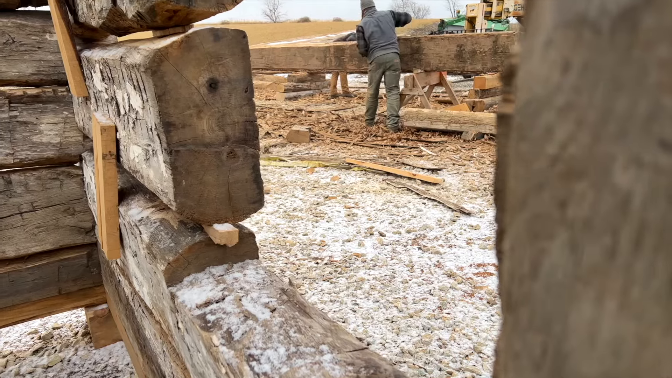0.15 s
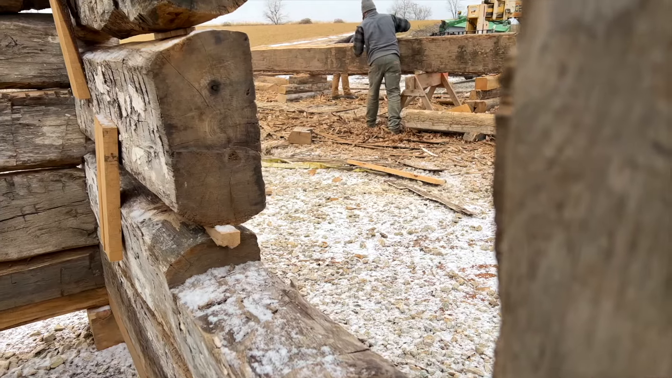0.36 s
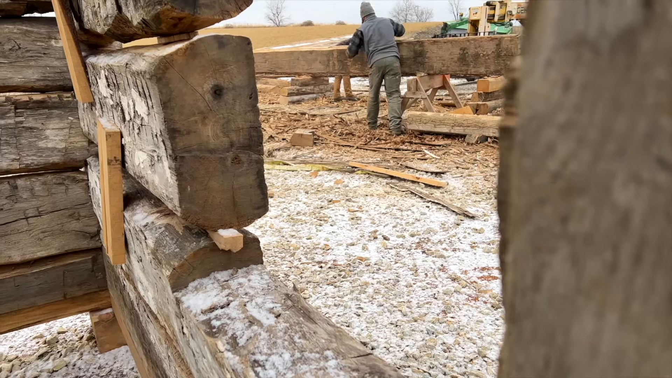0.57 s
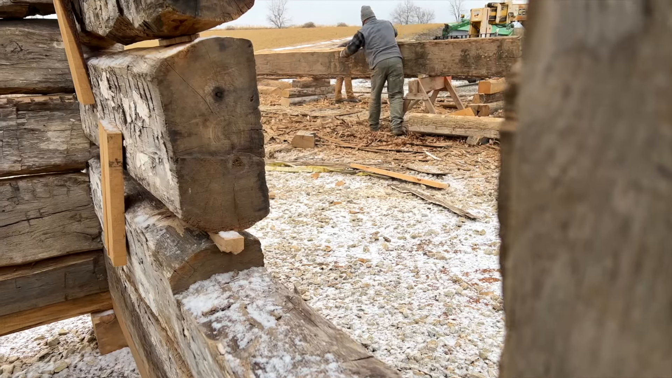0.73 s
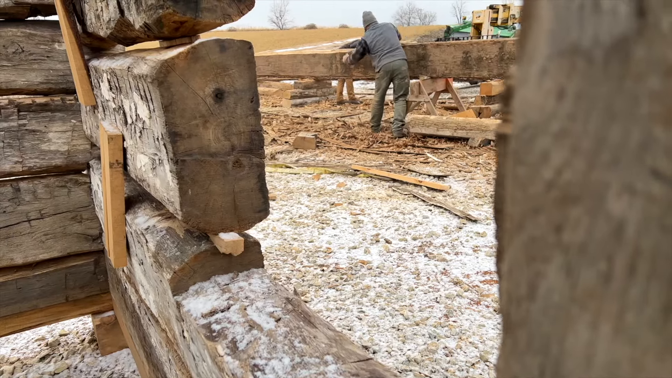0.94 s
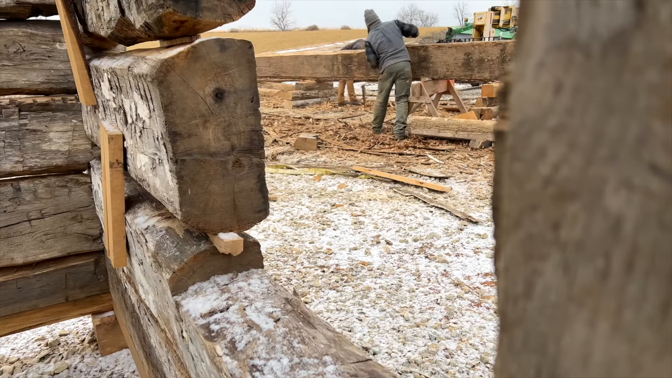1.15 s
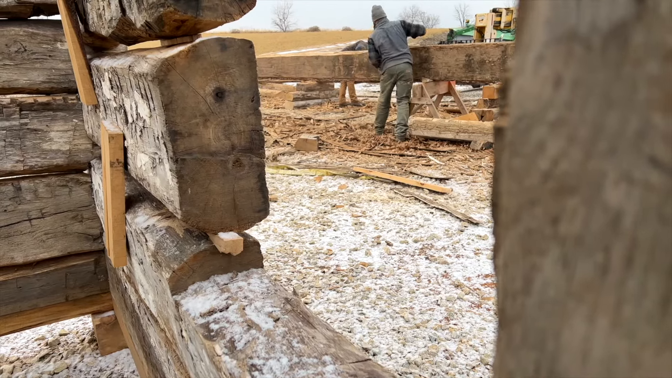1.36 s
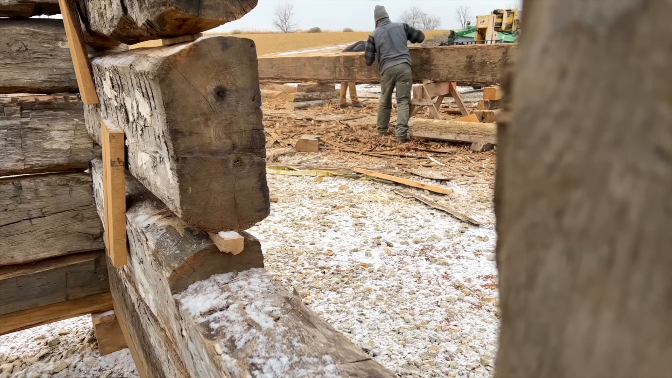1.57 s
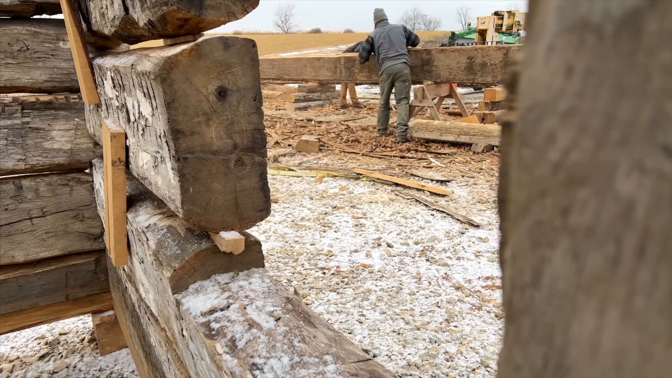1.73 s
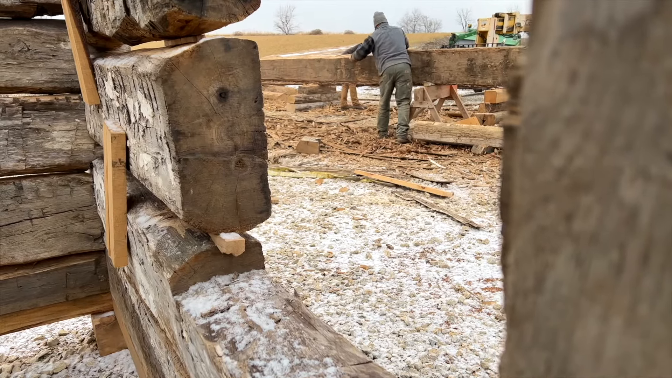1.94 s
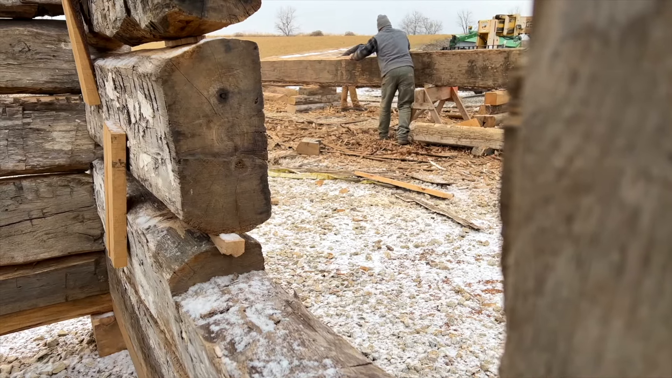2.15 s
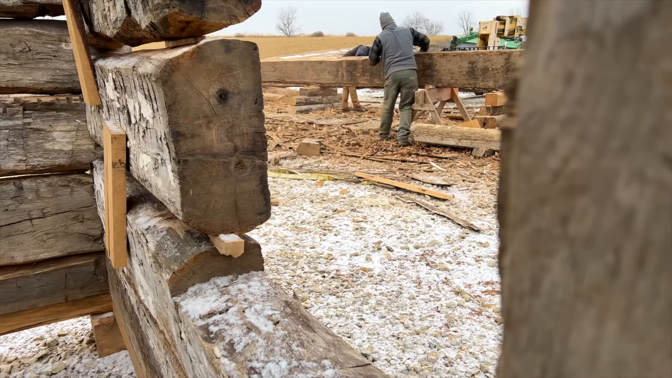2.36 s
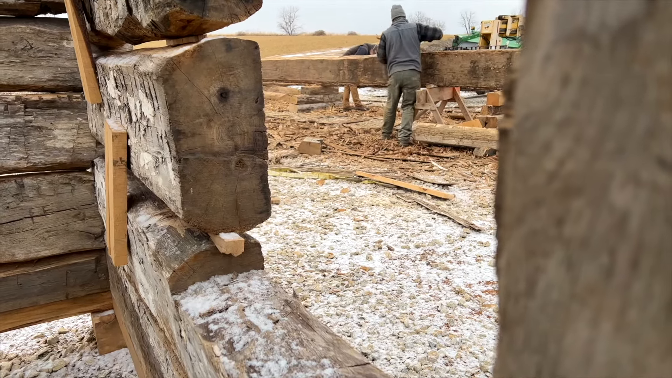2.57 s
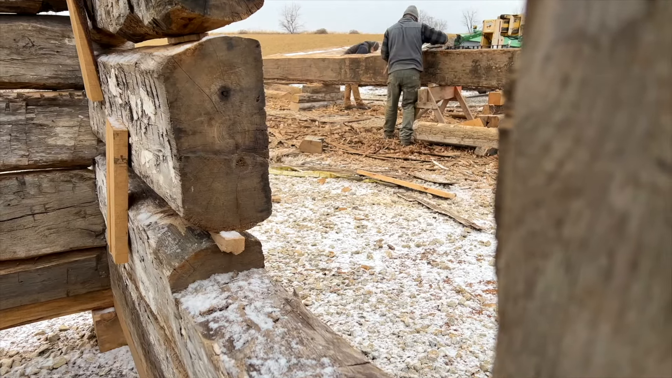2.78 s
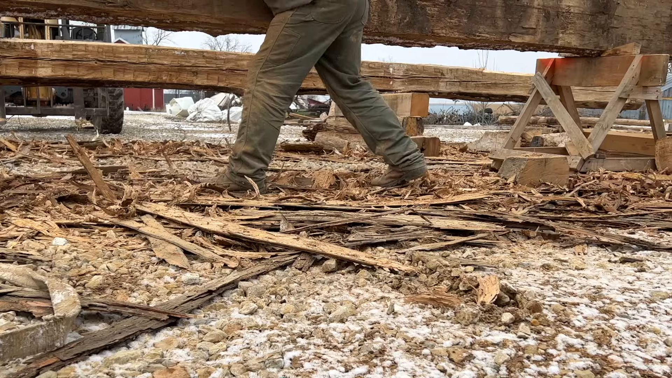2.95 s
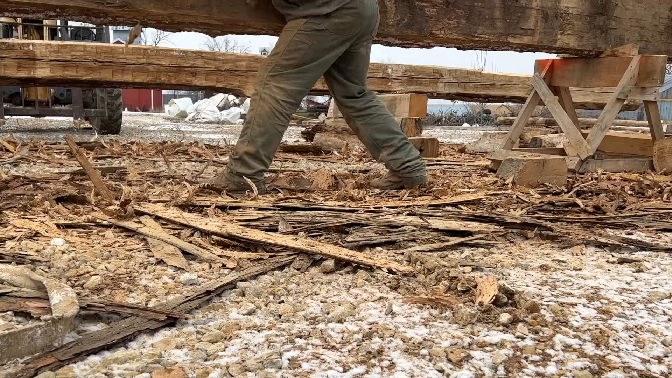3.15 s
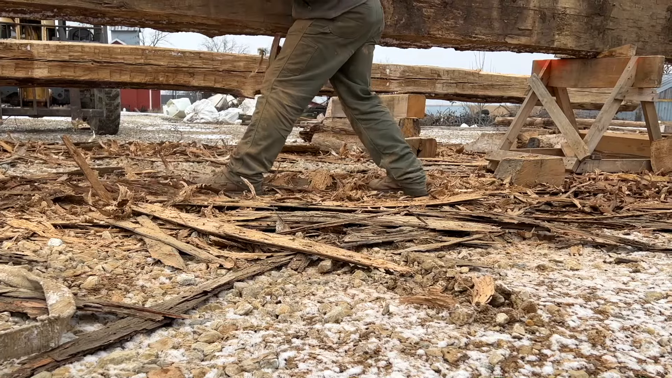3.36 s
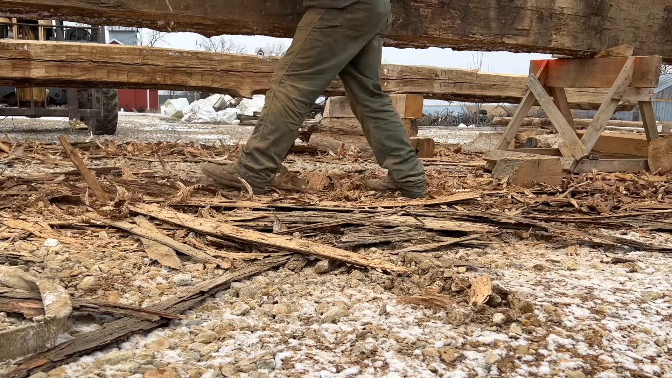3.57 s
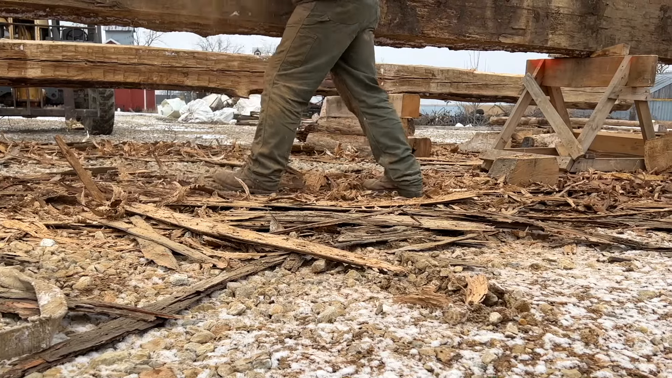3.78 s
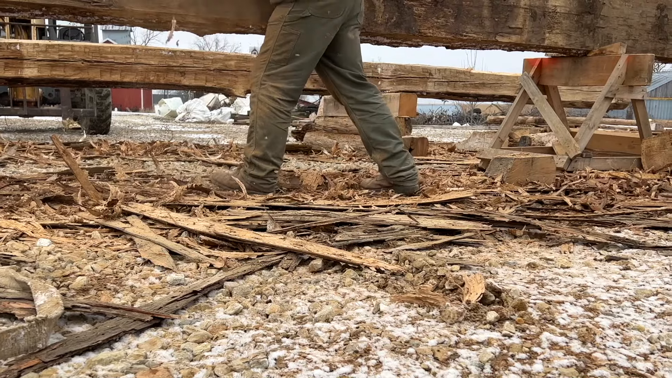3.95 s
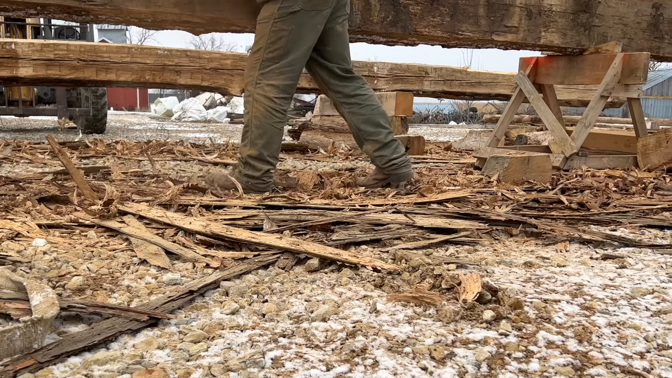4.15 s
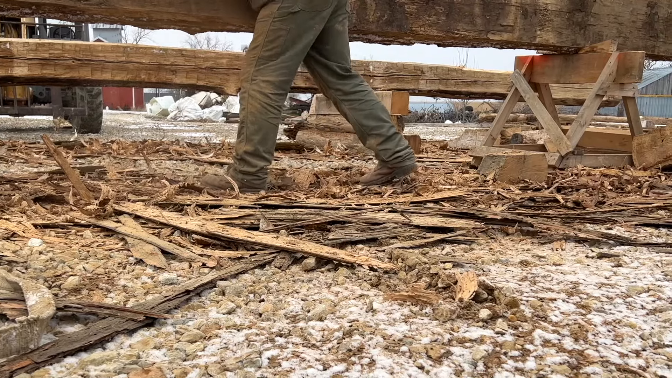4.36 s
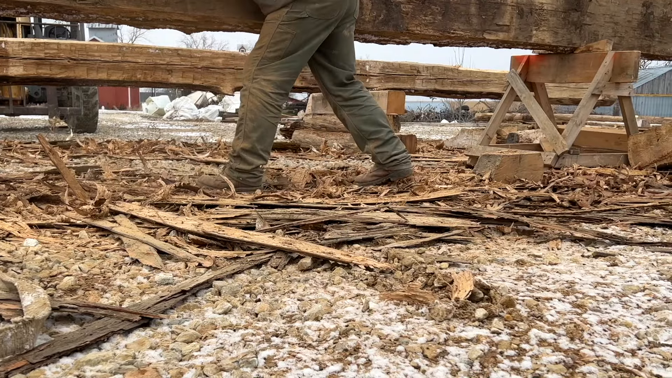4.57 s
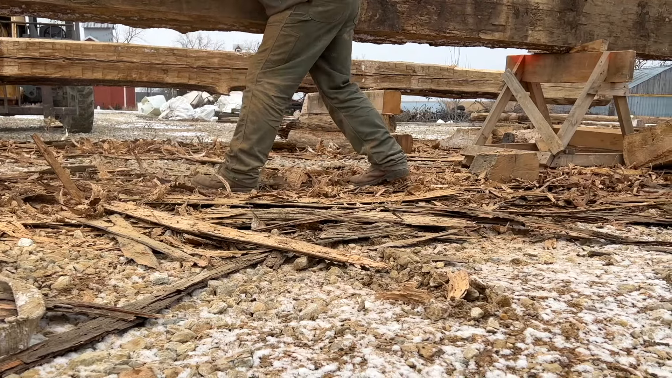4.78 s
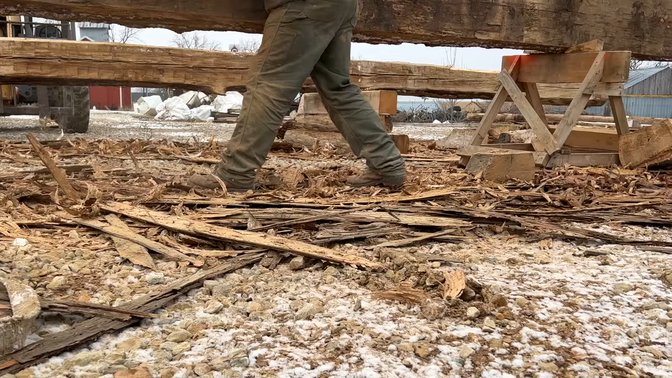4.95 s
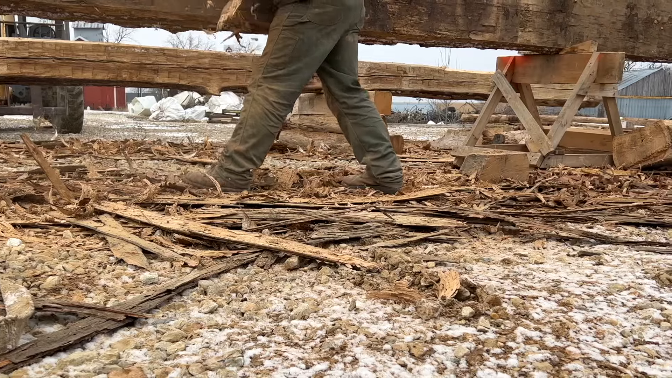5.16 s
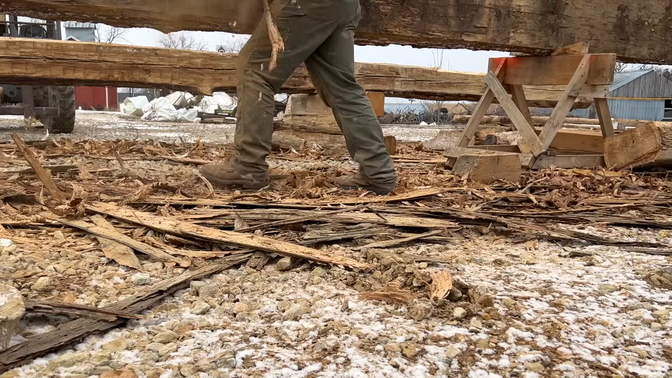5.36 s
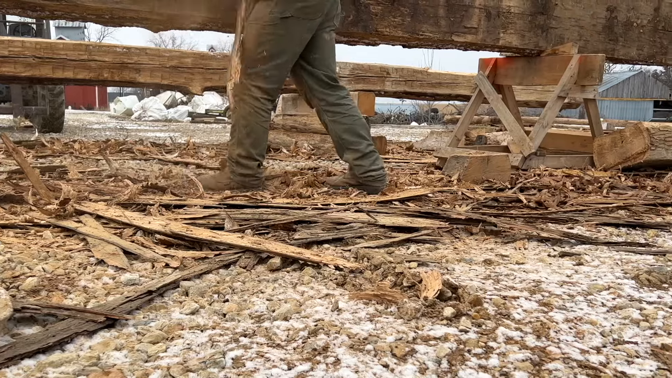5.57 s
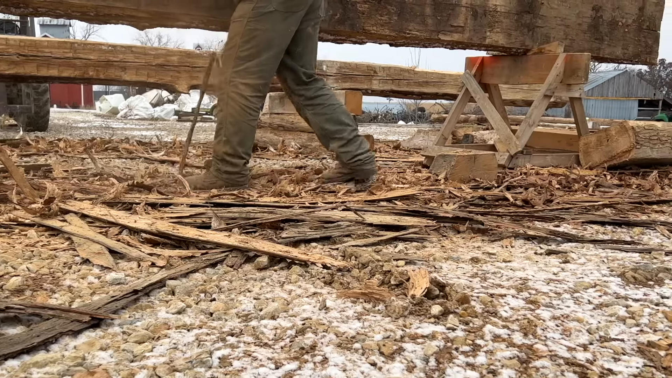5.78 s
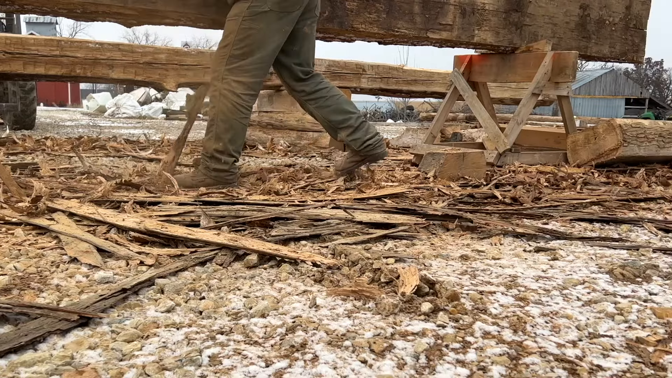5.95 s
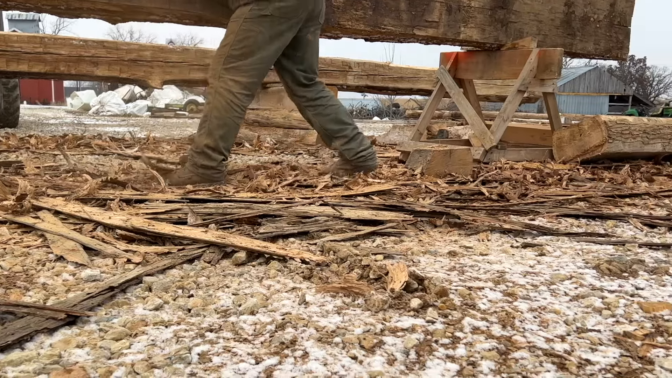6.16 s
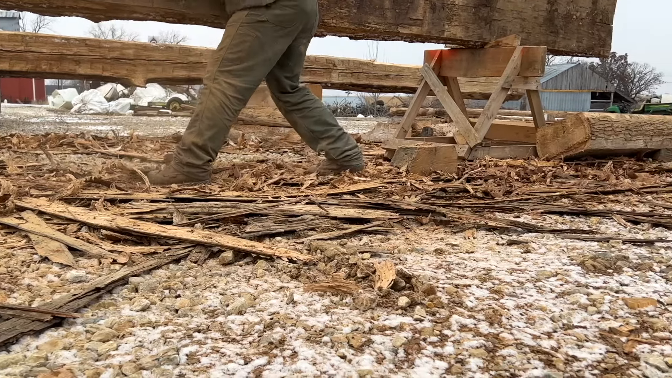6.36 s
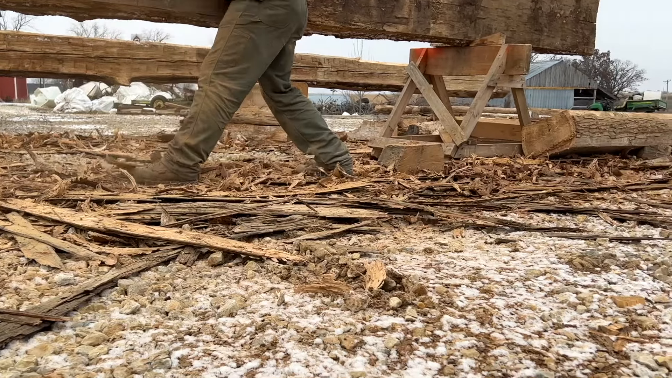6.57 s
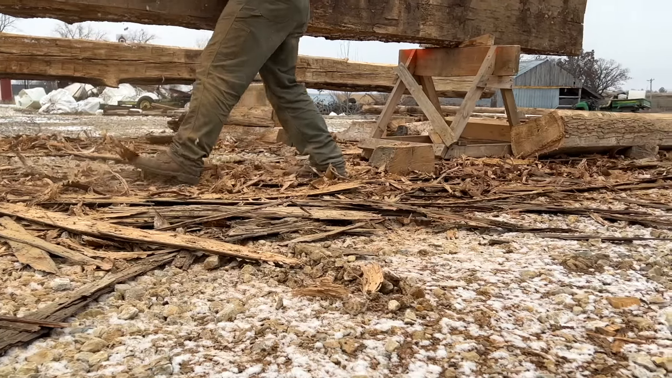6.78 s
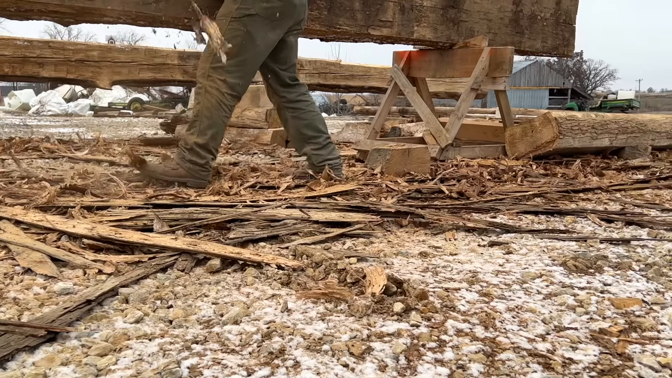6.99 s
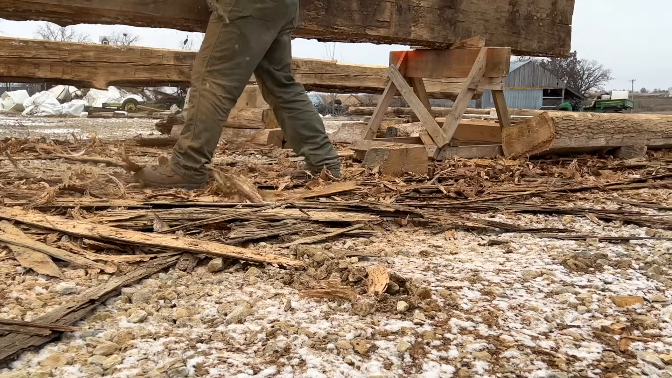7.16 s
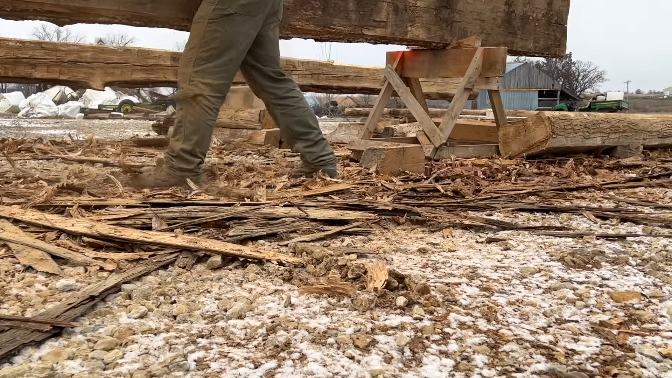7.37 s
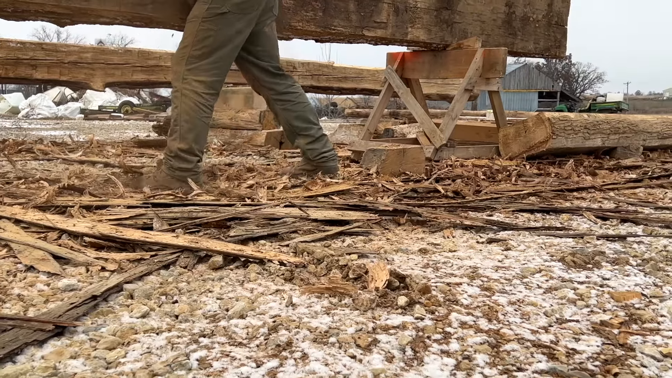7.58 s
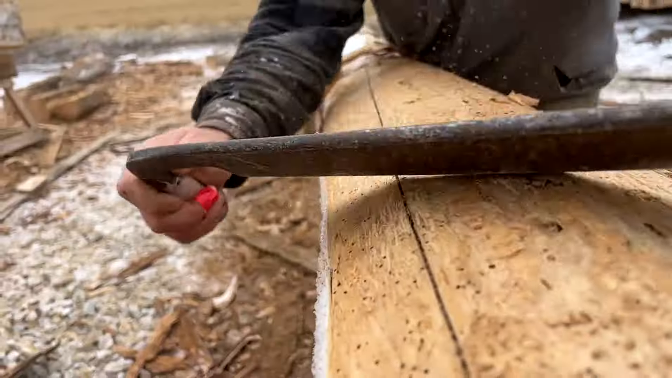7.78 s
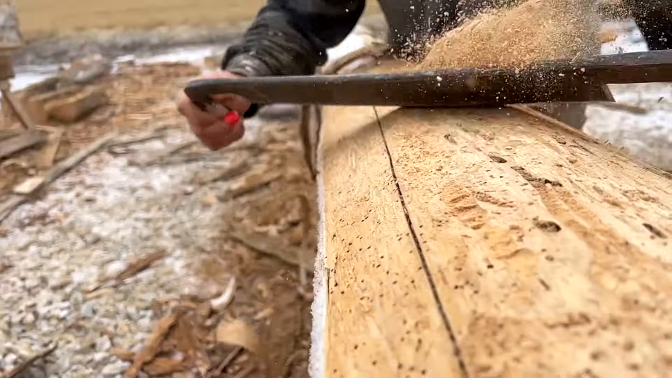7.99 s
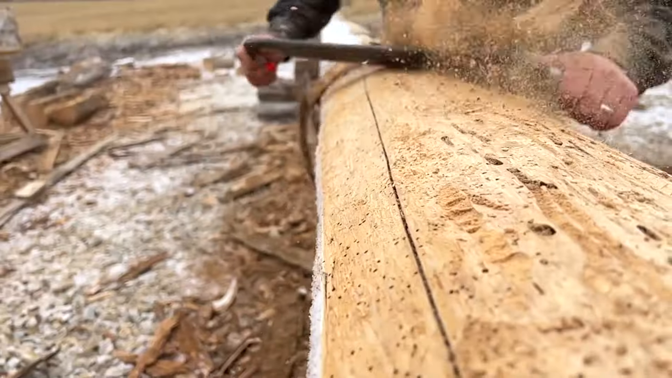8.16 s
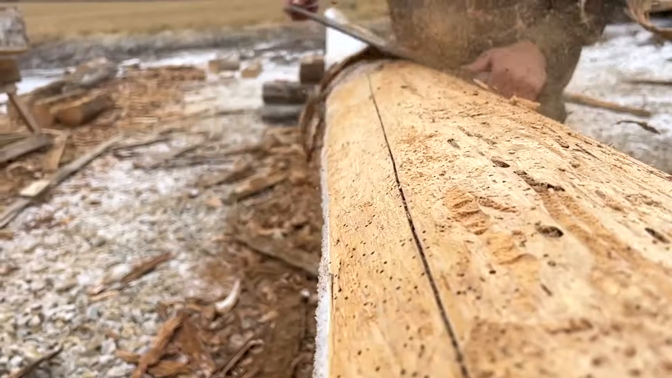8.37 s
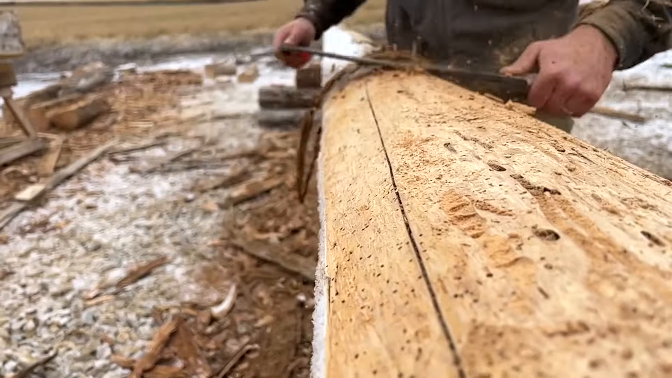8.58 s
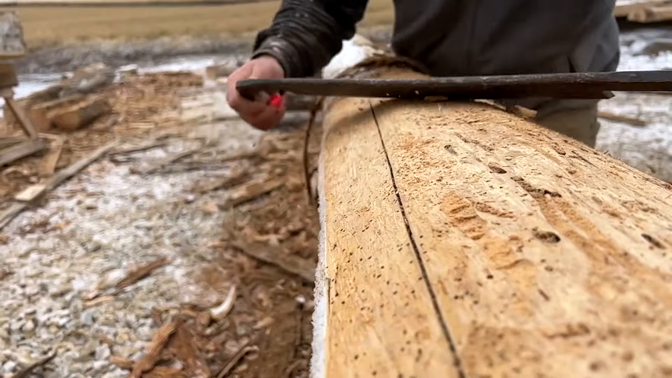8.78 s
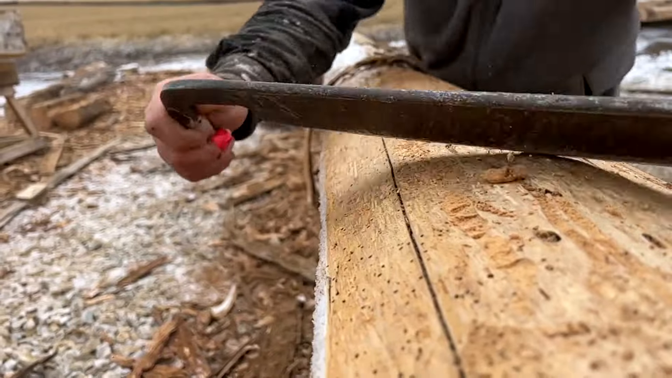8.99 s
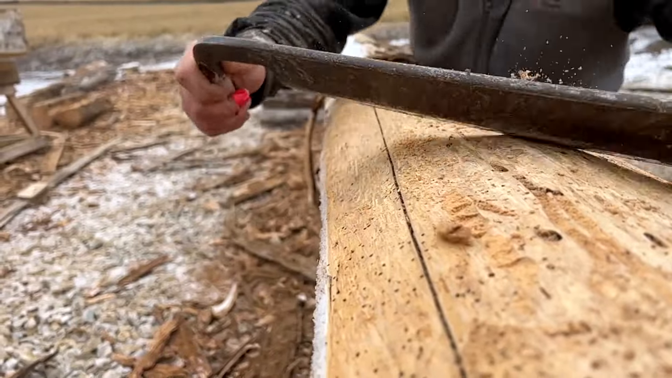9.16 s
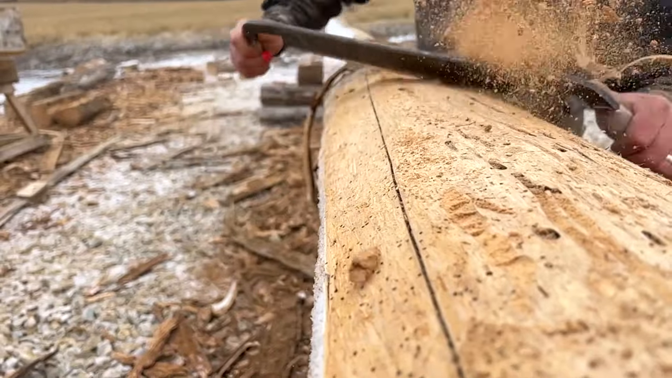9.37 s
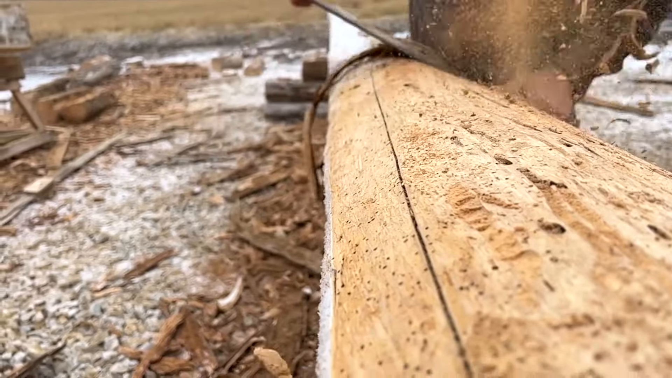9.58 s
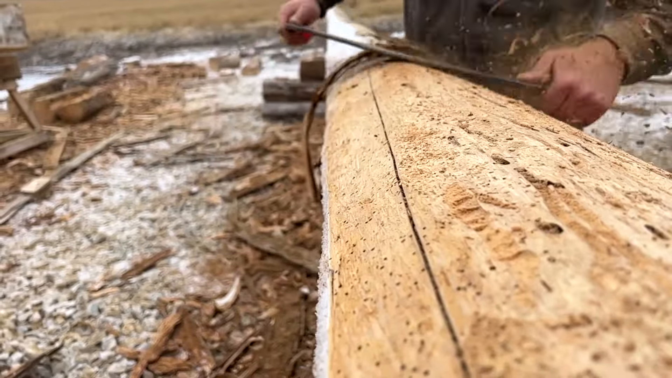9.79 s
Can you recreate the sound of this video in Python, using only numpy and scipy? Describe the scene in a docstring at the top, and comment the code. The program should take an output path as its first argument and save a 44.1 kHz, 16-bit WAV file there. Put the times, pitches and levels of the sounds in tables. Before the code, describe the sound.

A drawknife in a quiet open yard: clacks on wood, rumbling scrapes with small thuds, then swelling, chattering tears that stop abruptly. About four slow strokes along a beam, with short extra cuts, dry cracks and cloth swishes between them, then two strong rasping pulls on a log, brighter dust falling, and a final soft clunk. Close, dry stereo over faint distant rumble and lightly crackling shavings.

```python
"""Drawknife on a timber in an open yard

A blade knocks down, judders forward over a hewn beam, later a round log, and is pulled back through fibres.
Filtered noise breaks make tearing, rips, sawdust and sleeve swishes; short cracks make knocks and snaps.
Bending modes make the timber hum on after blows; shaped noise is the open air."""
import sys
import numpy as np
from scipy import signal
from scipy.fft import rfft, irfft, next_fast_len
from scipy.io import wavfile
from scipy.ndimage import uniform_filter1d

SR = 44100
rng = np.random.default_rng(int(sys.argv[2]) if len(sys.argv) > 2 else 0)


def digitize_waveform(pressure):
    """Quantize a signal to 16-bit integers and store it at the path in sys.argv[1].

    Rows of a 2-D input are taken as channels; values are limited to [-1, 1].
    """
    field = np.atleast_2d(pressure).T
    bounded = np.clip(field, -1, 1)
    quanta = np.round(bounded * 32767).astype(np.int16)
    wavfile.write(sys.argv[1], SR, quanta)


N = 433503
TIME = np.arange(N) / SR
SIZE = next_fast_len(N + SR // 2)
FREQ = np.fft.rfftfreq(SIZE, 1 / SR)


def undb(db):
    """Decibels to gain."""
    return 10 ** (np.asarray(db) / 20)


def along(points):
    """Values of (Hz, value) points at every frequency, joined on a log axis."""
    hz, value = np.transpose(points)
    return np.interp(np.log(FREQ + 1), np.log(np.abs(hz) + 1), value)


def causal(gain):
    """Minimum-phase response with this gain: it rings after a blow, never before."""
    cepstrum = irfft(np.log(gain + 1e-7), SIZE)
    cepstrum[1:SIZE // 2] *= 2
    cepstrum[SIZE // 2 + 1:] = 0
    return np.exp(rfft(cepstrum))


def through(x, response):
    """Filter by a frequency response."""
    return irfft(rfft(x, SIZE) * response, SIZE)[..., :N]


def unit(gain, band_hz=(0, SR)):
    """Scale a response so that white noise comes out at rms 1 within the band."""
    inside = (FREQ >= band_hz[0]) & (FREQ <= band_hz[1])
    return gain / np.sqrt(np.mean(np.abs(gain) ** 2 * inside))


def below(hz):
    """Gain of a steep crossover that passes what lies under hz."""
    return 1 / (1 + (FREQ / hz) ** 8)


def resonances(modes):
    """Gain of a set of (Hz, width Hz, dB) resonances, with valleys between them."""
    power = sum(undb(2 * db) / (1 + ((FREQ - hz) / width_hz) ** 2) ** 2 for hz, width_hz, db in modes)
    return np.sqrt(power)


def walk(rate_hz):
    """Random levels held 1 / rate_hz seconds and slewed; spread near 1."""
    count = max(int(SR / rate_hz), 2)
    held = rng.standard_normal(N)[np.arange(N) // count]
    return 1.22 * uniform_filter1d(held, count)


def fractures(rate_hz, spread_db):
    """Two trains of tiny breaks at the same instants, mostly small and a few large; rms 1."""
    size = undb(spread_db * np.minimum(rng.exponential(size=N), 5))
    size = size * (rng.random(N) < rate_hz / SR)
    return size * rng.standard_normal((2, N)) / np.sqrt(np.mean(size ** 2))


def stroke(start_s, length_s, attack_s, release_s):
    """Gain of one movement: it builds up, holds for its length and dies away."""
    rise = np.clip((TIME - start_s) / attack_s, 0, 1)
    fall = np.exp(-np.maximum(TIME - start_s - length_s, 0) / release_s)
    return np.sin(np.pi / 2 * rise) ** 2 * fall


def ramp(start_s, length_s, db_per_s):
    """Gain that changes steadily through a movement and is 1 halfway."""
    return undb(db_per_s * (np.clip(TIME - start_s, 0, length_s) - length_s / 2))


# likeness of left and right: (frequency [Hz], correlation [-1..1])
LEFT_RIGHT_LIKENESS = [(60, 0.97), (280, 0.75), (1000, 0.35), (3000, -0.0059), (9500, -0.096),
                       (12500, 0.31)]


def stereo(pair, response, pan_db=0, lead=1):
    """Direct sound leads on the left (lead > 0) or right (lead < 0); scatter widens the treble."""
    likeness = np.clip(along(LEFT_RIGHT_LIKENESS), -.9, .98)
    direct_share = 0.59 * below(4500)
    width = np.sqrt((1 - likeness) / (1 + likeness))
    sound, scatter = rfft(pair, SIZE) * response
    side = width * (1j * lead * direct_share * sound + np.sqrt(1 - direct_share ** 2) * scatter)
    left_right = irfft(np.array([sound + side, sound - side]), SIZE)[:, :N]
    return left_right * undb(np.array([[pan_db], [-pan_db]]) / 2)


# open-air spectrum: (frequency [Hz], level [dB per Hz])
AIR_SPECTRUM = [(20, -25), (55, -1), (120, -3.5), (250, -10), (600, -24.5), (3500, -32.5), (7500, -32),
                (15000, -48)]
# spectrum of dull cracks in wood: (frequency [Hz], level [dB per Hz])
KNOCK_SPECTRUM = [(450, 10.5), (680, 6.5), (920, 20), (1500, 12), (2200, 17.5), (3300, 3.5), (14000, -26)]
RUSTLE_SWING_DB = 4.5  # crumbs and loose shavings crackle in spurts


def yard(air_db=-35.5, rustle_db=-55):
    """Open air with a low far rumble, and shavings that crackle underfoot."""
    air = stereo(rng.standard_normal((2, N)) * undb(walk(5.5)), unit(undb(along(AIR_SPECTRUM))))
    crackle = fractures(340, 0.43) * undb(RUSTLE_SWING_DB * walk(14))
    litter = stereo(crackle, unit(causal(undb(along(KNOCK_SPECTRUM)))))
    return undb(air_db) * air + undb(rustle_db) * litter


# sleeve brushes: (start [s], length [s], relative level [dB])
SWISHES = [(0.03, 0.14, -33.5), (0.877, 0.15, -33.5), (1.488, 0.1, -29.5), (3.532, 0.094, -30),
           (4.34, 0.17, -33.5), (4.998, 0.16, -32.5), (5.738, 0.13, -33)]
# cloth spectrum: (frequency [Hz], level [dB per Hz])
CLOTH_SPECTRUM = [(700, -21.5), (1150, -6.5), (2000, -19), (3100, -12.5), (4150, 0.5), (5300, -13),
                  (6600, -0.5), (7800, -12.5), (15000, -18)]


def sleeves(level_db=8.5, rough_db=2.0, edge_s=0.056):
    """Stiff cloth rubs on cloth as the arms swing: a short, grainy swish."""
    swing = np.zeros(N)
    for start_s, length_s, db in SWISHES:
        edge = np.minimum(TIME - start_s, start_s + length_s - TIME)
        swing += undb(db) * np.clip(edge / edge_s, 0, 1)
    threads = fractures(7600, 0.38) * swing * undb(rough_db * walk(170))
    return undb(level_db) * stereo(threads, unit(causal(undb(along(CLOTH_SPECTRUM)))), pan_db=-2.0)


def strike(events, ring):
    """Play a short response at every (s, dB)."""
    blows = np.zeros(N)
    for at_s, db in events:
        blows[int(np.clip(at_s * SR, 0, N - 1))] += undb(db)
    return signal.fftconvolve(blows[None], ring, axes=1)[:, :N]


def hits(events, spectrum, level_db, rattle_db, rattle_s, tail_db, tail_s, rise_s=0.000067):
    """A sharp crack, a rattle that builds over rise_s and a faint scatter from the stacked wood."""
    response = causal(undb(along(spectrum)))
    response /= np.abs(irfft(response, SIZE)).max()
    t = TIME[:SR // 2]
    rattle = undb(rattle_db) * np.exp(-(t / rattle_s) ** 2)
    tail = undb(tail_db) * np.exp(-t / tail_s)
    decay = (rattle + tail) * (1 - np.exp(-t / rise_s))
    scatter = stereo(strike(events, decay[None]) * rng.standard_normal((2, N)), response)
    crack = through(strike(events, np.ones((1, 1))), response)
    return undb(level_db) * (crack + scatter)


# dry splinters: (time [s], relative level [dB])
SNAPS = [(0.095, -16.5), (0.745, -24.5), (1.946, -17), (2.0153, -16), (3.556, -17), (4.206, -24),
         (5.699, -17), (7.1575, -12.5), (7.799, -21), (7.885, -5)]
# bright crack spectrum: (frequency [Hz], level [dB per Hz])
SNAP_SPECTRUM = [(800, 15.8), (6800, 16.8), (15000, 0.5)]


def snaps():
    """Dry splinters snap: bright cracks with a long, faint tail."""
    return hits(SNAPS, SNAP_SPECTRUM, level_db=-4, rattle_db=-6.0, rattle_s=0.011,
                tail_db=-35.0, tail_s=0.17, rise_s=0.00072)


# bending modes of the timber: (frequency [Hz], free t60 [s], level [dB])
TIMBER_MODES = [(117.3, 0.5, 5), (178, 0.5, 4.5), (220, 0.15, 6), (275, 0.14, 1.5), (330, 0.32, 4),
                (392.7, 0.4, -7)]


def timber_ring():
    """Frequency response of the timber's bending modes."""
    modes = sum(undb(db) / (1 + 2j * np.pi * (FREQ - hz) * t60_s / np.log(1000))
                for hz, t60_s, db in TIMBER_MODES)
    return unit(modes * below(700))


# blade slides, and timber rumbling under the deep pull:
# (start [s], length [s], relative level [dB], pressure growth [dB/s], wood)
SLIDES = [(0.3, 0.74, -27, -2, "beam"), (1.712, 0.77, -20, 2.5, "beam"), (2.343, 0.31, -18.5, -3, "beam"),
          (3.768, 0.67, -27, -6, "beam"), (5.325, 0.43, -23.5, 33, "beam"), (6.516, 0.56, -32, 6, "beam"),
          (7.25, 0.67, -29.5, -15, "beam"), (8.6, 0.16, -26.5, 47, "log"), (8.812, 0.19, -31, -6, "log")]


def pressure_on(wood, settle_s=0.079, lift_s=0.059):
    """Weight of the blade on one kind of wood."""
    return sum(undb(db) * stroke(start_s, length_s, settle_s, lift_s) * ramp(start_s, length_s, growth)
               for start_s, length_s, db, growth, kind in SLIDES if kind == wood)


# rumble spectrum under the blade: (frequency [Hz], level [dB per Hz])
RUMBLE_SPECTRUM = [(60, -35), (240, -2.5), (560, -27), (950, -21.5), (3000, -40), (12000, -44)]
# blade resonances: (frequency [Hz], width [Hz], level [dB])
BLADE_MODES = [(964, 39, -2), (1200, 67, -1), (1420, 66, -3), (1880, 49, -1), (2400, 93, 0), (2740, 50, -1),
               (3150, 37, -4), (3410, 80, -3), (4050, 55, -1), (6790, 80, -8)]
# log resonances under the flat of the blade: (frequency [Hz], width [Hz], level [dB])
LOG_MODES = [(195, 50, 0), (388, 70, -3), (950, 330, -16)]
STEEL_ON_LOG_DB = -19  # damped blade resonances, relative to BLADE_MODES


def slides(wood, modes, level_db, timber_db, blade_db, grit_db, judder_db=3.0, judder_hz=40):
    """The blade judders over tool marks; the timber rumbles, the steel rings and crumbs crackle."""
    pressure = pressure_on(wood) * undb(judder_db * walk(judder_hz))
    colour = np.hypot(unit(undb(along(RUMBLE_SPECTRUM))), undb(blade_db) * unit(resonances(modes)))
    rumble_response = unit(causal(colour) + undb(timber_db) * timber_ring())
    rumble = stereo(fractures(2500, 2.64) * pressure, rumble_response)
    crackle = fractures(1500, 0.91) * pressure * undb(RUSTLE_SWING_DB * walk(judder_hz))
    grit_colour = np.hypot(undb(along(SNAP_SPECTRUM)), undb(along(KNOCK_SPECTRUM)))
    crumbs = stereo(crackle, unit(causal(grit_colour)))
    return undb(level_db) * rumble + undb(grit_db) * crumbs


# blade knocks on the timber: (time [s], relative level [dB])
KNOCKS = [(0.3215, -7), (0.422, -17), (0.503, -21), (0.523, -16), (0.635, -16.5), (1.748, -6), (2.808, -20),
          (3.7835, -6), (3.884, -16), (3.965, -20), (3.985, -16), (4.099, -17), (5.514, -5), (5.61, -15),
          (5.654, -18), (5.684, -13), (6.939, -17), (7.122, -17), (7.247, -10)]


def knocks(bounce_s=0.023, bounce_db=-15.5):
    """The blade knocks on the timber and comes down once more after each knock."""
    bounces = [(at_s + bounce_s, db + bounce_db) for at_s, db in KNOCKS]
    return hits(KNOCKS + bounces, KNOCK_SPECTRUM, level_db=-0.5, rattle_db=-31.0, rattle_s=0.0071,
                tail_db=-32.5, tail_s=0.022)


# the sliding blade drops over ridges: (time [s], relative level [dB], pitch favoured at the spot [Hz])
BUMPS = [(0.551, -15, 213), (0.778, -16, 231), (2.39, -10, 335), (2.508, -7, 320), (4.013, -15.5, 213),
         (4.239, -14.5, 233), (5.531, -15.5, 170), (5.721, -9, 270), (6.5, -14, 178), (7.313, -12, 300),
         (7.503, -18.5, 230), (8.731, -11, 197), (8.89, -14.5, 215), (8.949, -14, 175)]


def thuds(events, level_db, push_s, vary_db=2, focus_db_per_octave=16, hand_damping=0.7):
    """Blows bend the timber; each spot favours modes near one pitch; the pressed blade shortens t60."""
    out, t = np.zeros(N + SR), TIME[:SR // 2]
    hz, t60_s, db = np.transpose(TIMBER_MODES)[:, :, None]
    for at_s, peak_db, spot_hz in events:
        level_chance, pitch_chance = rng.standard_normal((2, len(TIMBER_MODES), 1))
        weight_db = db + vary_db * level_chance - focus_db_per_octave * np.abs(np.log2(hz / spot_hz))
        decay = undb(weight_db - 60 * t / (hand_damping * t60_s))
        modes = decay * np.sin(2 * np.pi * hz * (1 + 0.042 * pitch_chance) * t)
        ring = modes.sum(0) * (1 - np.exp(-t / push_s))
        out[int(at_s * SR):][:len(t)] += undb(peak_db + level_db) * ring / np.abs(ring).max()
    return out[:N]


def timber_thuds():
    """The timber hums after knocks and after drops over ridges."""
    knocked = [(at_s, db, 170) for at_s, db in KNOCKS]
    return thuds(knocked, level_db=-13, push_s=.008) + thuds(BUMPS, level_db=-1.5, push_s=.006)


def chatter(slip_hz=150, jitter=0.3, fall_db=6.5):
    """The edge sticks and slips: each slip starts loud and fades, at an unsteady rate; rms 1."""
    phase = np.cumsum(slip_hz * np.exp(jitter * walk(slip_hz))) / SR
    slips = undb(-fall_db * (phase % 1))
    return slips / np.sqrt(np.mean(slips ** 2))


def glance(x, echo=0.4, lag_s=.0024, drift=0.1544):
    """The ground throws the sound back; the path shifts as the blade travels."""
    lag = lag_s * (1 + drift * walk(4))
    reflected = np.array([np.interp(TIME - lag, TIME, channel) for channel in x])
    return (x + echo * reflected) / np.hypot(1, echo)


# pulls: (start [s], length [s], deepest after [s], relative cutting level [dB],
# splintering re cutting [dB], splintering change [dB/s], kind of cut)
PULLS = [ (0.916, 0.45, 0.26, -23.5, 0, 0, "beam"), (1.349, 0.18, 0.045, -34.5, -2.5, -2, "beam"),
         (1.762, 0.64, 0.052, -33.5, 2.5, 38, "beam"), (2.928, 0.48, 0.28, -24, 0, -1, "beam"),
         (3.39, 0.14, 0.058, -35.5, -1, -6, "beam"), (4.478, 0.52, 0.36, -22.5, -2, -9, "beam"),
         (5.041, 0.074, 0.097, -29.5, -8, 0, "beam"), (6.032, 0.48, 0.41, -23, 2, -6, "end"),
         (7.086, 0.13, 0.078, -25, 4, -8, "end"), (2.277, 0.14, 0.13, -26, 8, 4, "deep"),
         (2.387, 0.2, 0.12, -22, 1, -6, "deep"), (2.571, 0.065, 0.055, -26.5, 4, 0, "deep"),
         (7.754, 0.44, 0.35, -19.5, -1, -23, "deep"), (9.098, 0.34, 0.21, -18.5, -1, -2, "deep")]
# shallow along the beam, at its end, deep: kind: (bite [s], dig in [dB/s], ease off [dB/s], leave wood [s])
CUTS = {"beam": (0.095, 34.5, 24.5, 0.021), "end": (0.19, 27.6, 54, 0.042),
        "deep": (0.096, 22.6, 42, 0.015)}


def effort(cut, splinter_growth=0.57):
    """Cutting force and fine splintering: the edge bites, digs in, eases and leaves the wood."""
    bite_s, dig_db_per_s, ease_db_per_s, leave_s = CUTS[cut]
    force, fine = np.zeros((2, N))
    for start_s, length_s, deepest_s, db, fine_db, fine_db_per_s, kind in PULLS:
        if kind == cut:
            late_s = TIME - start_s - deepest_s
            depth_db = -np.abs(late_s * np.where(late_s < 0, dig_db_per_s, ease_db_per_s))
            pull = undb(db + depth_db) * stroke(start_s, length_s, bite_s, leave_s)
            force += pull
            # splinter_growth: extra dB of splintering per dB of depth
            splinter_gain = undb(fine_db + splinter_growth * depth_db)
            fine += pull * splinter_gain * ramp(start_s, length_s, fine_db_per_s)
    return force, fine


def sag(x, cut, sag_per_s=0.25):
    """Resonances start high and sink through each pull, as the shaving lengthens."""
    ahead_s = sum(sag_per_s / 2 * np.maximum((TIME - start_s) * (start_s + length_s - TIME), 0)
                  for start_s, length_s, *_, kind in PULLS if kind == cut)
    return np.array([np.interp(TIME + ahead_s, TIME, channel) for channel in x])


def shifting(x, swell_db=2.2):
    """As the contact travels over the grain, narrow resonances swell and fade at random."""
    spectra = signal.stft(x, SR, nperseg=512)[2]
    swell = rng.standard_normal(spectra.shape[1:])
    for axis, size in ((0, 3), (0, 3), (1, 7), (1, 7)):  # smooth over pitch, then over time
        swell = uniform_filter1d(swell, size, axis=axis)
    gain = undb(swell_db * swell / swell.std())
    return signal.istft(spectra * gain / np.sqrt(np.mean(gain ** 2)), SR)[1][:, :N]


# tearing spectra, shallow and deep: (frequency [Hz], level [dB per Hz])
BEAM_TEAR = [(50, -43), (110, 5), (330, -2), (600, -8), (900, -5.5), (1500, -8.5), (2300, -21),
             (4000, -19.5), (6500, -79), (8000, 0), (15000, -8.5)]
DEEP_TEAR = [(50, -16.5), (170, 12.5), (300, -0.5), (600, -1.5), (3000, -5), (5000, -11), (6500, -7.5),
             (9000, -12.5), (15000, -21.5)]
# resonances of blade and wood along the beam and at its end: (frequency [Hz], width [Hz], level [dB])
BEAM_MODES = [(944, 26, 12.5), (2045, 184, 8), (2480, 140, 8), (5820, 1530, 12)]
END_MODES = [(850, 58, 4.5), (1206, 90, -0.5), (2030, 250, -5.5), (2460, 100, -3.5), (3470, 93, -11),
             (5890, 1140, 10.5)]


def pulls(cut, tear, modes, ring_db, tear_db, timber_db, pan_db, lead=1, rate_hz=14000,
          fibre_spread_db=1.4, catch_db=1.9, catch_hz=110):
    """Fibres break under the edge and ring blade and wood; the edge catches and chatters in the grain."""
    catching = undb(catch_db * walk(catch_hz))
    breaks = glance(fractures(rate_hz, fibre_spread_db) * chatter() * catching)
    force, splinters = (breaks * gain * undb(tear_db) for gain in effort(cut))
    body_band_hz, fine_band_hz = (700, 3500), (4500, 10000)
    bass, coarse = below(600), below(4000)
    tearing = unit(undb(along(tear)), body_band_hz)
    ringing = undb(ring_db) * unit(resonances(modes), body_band_hz)
    response = causal(np.hypot(tearing, ringing))
    body = unit(response, body_band_hz)
    low = stereo(force, body * bass + undb(timber_db) * timber_ring(), 0, lead)
    rasp = stereo(force, body * (coarse - bass), pan_db, lead)
    fine = stereo(splinters, unit(response, fine_band_hz) * (1 - coarse), pan_db, lead)
    if cut != "deep":  # a deep cut rings the steel, whose pitch stays put
        rasp = sag(rasp, cut)
    return shifting(low + fine + rasp)


# shavings split away: (start [s], length [s], level [dB])
RIPS = [(1.291, 0.025, -22), (2.169, 0.015, -19), (2.565, 0.0093, -20), (2.63, 0.0084, -22.5),
        (3.328, 0.022, -19.5), (4.935, 0.013, -19.5), (6.467, 0.03, -19), (7.156, 0.022, -25),
        (8.05, 0.019, -26)]


def rips(crack_hz=3000, attack_s=0.0047, release_s=0.0066):
    """A run of coarse cracks as the split races ahead of the edge."""
    split = sum(undb(db) * stroke(start_s, length_s, attack_s, release_s) for start_s, length_s, db in RIPS)
    return stereo(fractures(crack_hz, 0.92) * split, unit(causal(undb(along(KNOCK_SPECTRUM)))))


def dust(start_s=8.28, length_s=1.0, level_db=-48):
    """Fine sawdust thrown from the log falls: a dense, faint patter of bright breaks."""
    fall = stroke(start_s, length_s, 0.03, .08)
    treble = undb(along(SNAP_SPECTRUM)) * (1 - below(5800))
    return undb(level_db) * stereo(fractures(5000, 1.0) * fall, unit(causal(treble)))


# log resonances under the dropped blade: (frequency [Hz], width [Hz], level [dB])
CLUNK_MODES = [(400, 450, -0.5), (2400, 5000, -14.5)]


def clunk(at_s=9.556, length_s=0.016, edge_s=0.0048, level_db=-27):
    """The lifted blade comes down on the round log with a dull thump."""
    contact = fractures(8000, 0) * stroke(at_s, length_s, edge_s, edge_s)
    return undb(level_db) * stereo(contact, unit(causal(resonances(CLUNK_MODES))), lead=-1.3)


def scene():
    """All the work on the timber, in the open yard."""
    beam_slides = slides("beam", BLADE_MODES, level_db=-7.5, timber_db=2.0, blade_db=-10, grit_db=-22)
    damped_steel = [(hz, width_hz, db + STEEL_ON_LOG_DB) for hz, width_hz, db in BLADE_MODES]
    log_slides = slides("log", LOG_MODES + damped_steel, level_db=-1, timber_db=-20, blade_db=7, grit_db=-23)
    beam = pulls("beam", BEAM_TEAR, BEAM_MODES, ring_db=7.0, tear_db=0.0, timber_db=0.0, pan_db=-2.0)
    beam_end = pulls("end", BEAM_TEAR, END_MODES, ring_db=7.5, tear_db=-1.0, timber_db=4.0, pan_db=-1.0)
    deep = pulls("deep", DEEP_TEAR, BLADE_MODES, ring_db=-1.5, tear_db=-0.5, timber_db=-16.5,
                 pan_db=-1.5, lead=-0.88)
    cutting = beam + beam_end + deep + rips() + dust()
    blows = snaps() + knocks() + timber_thuds() + clunk()
    return yard() + sleeves() + beam_slides + log_slides + cutting + blows


def record(dry, dip_hz=10800, dip_width_hz=750, dip_db=-13, low_hz=30, top_hz=16000):
    """The microphone loses deep bass and dips in the treble; peaks stop at full scale, the top is cut."""
    dip = undb(dip_db / (1 + ((FREQ - dip_hz) / dip_width_hz) ** 2))
    bass_loss = FREQ ** 2 / np.hypot(FREQ ** 2, low_hz ** 2)
    heard = through(dry, causal(dip * bass_loss))
    top_cut = signal.ellip(10, .2, 80, top_hz, fs=SR, output="sos")
    return signal.sosfilt(top_cut, np.clip(heard, -1, 1))


dry = scene()
out = record(dry)
digitize_waveform(out)
```